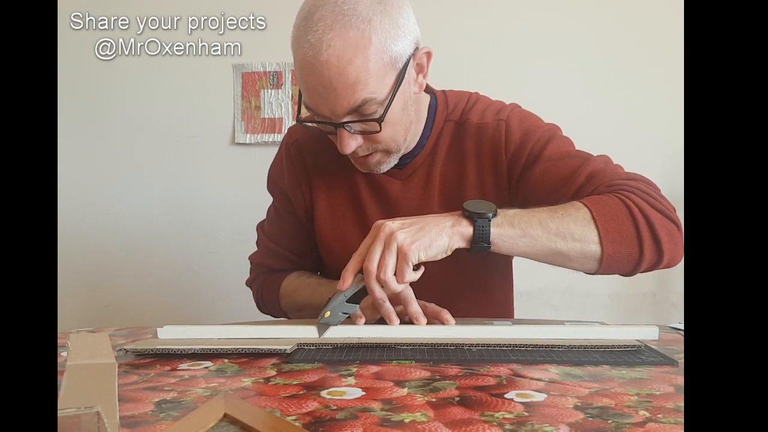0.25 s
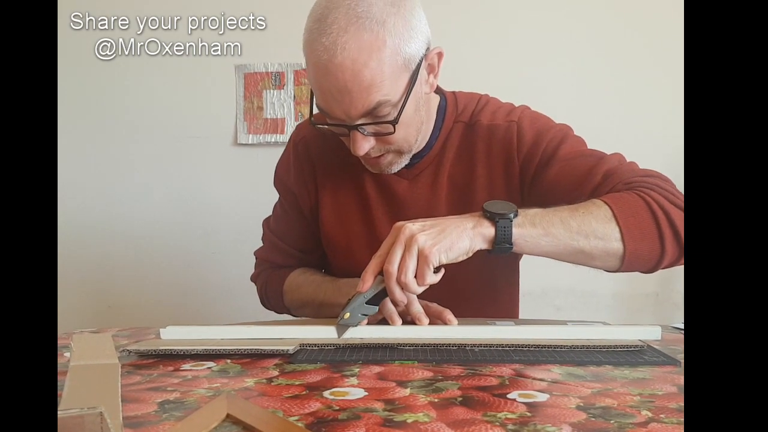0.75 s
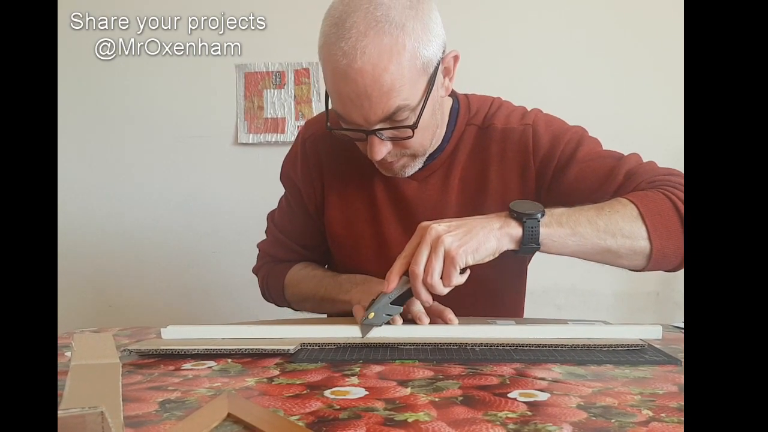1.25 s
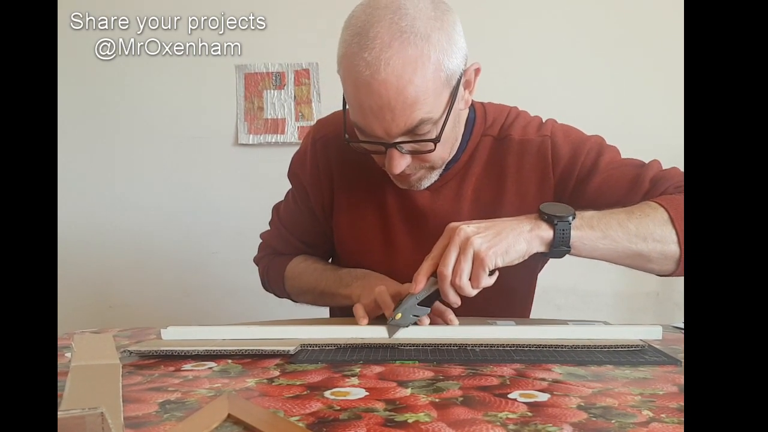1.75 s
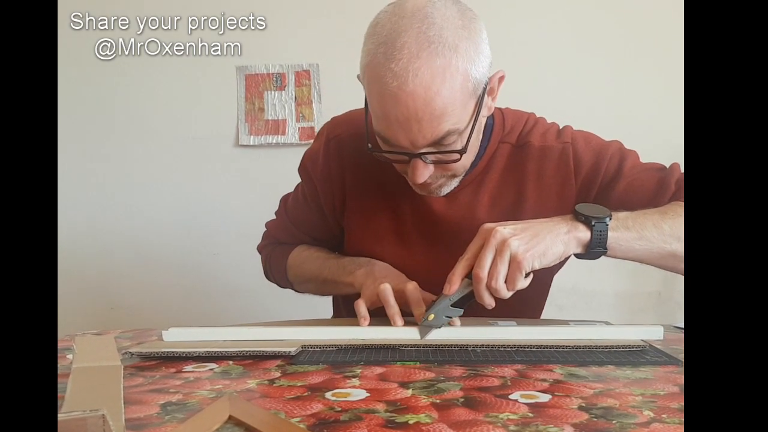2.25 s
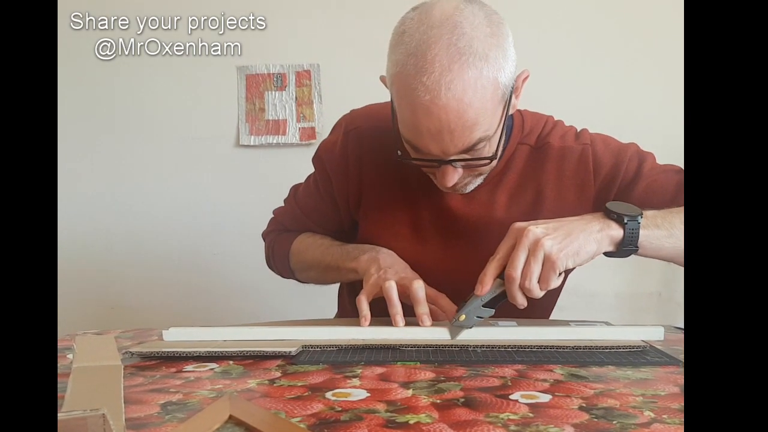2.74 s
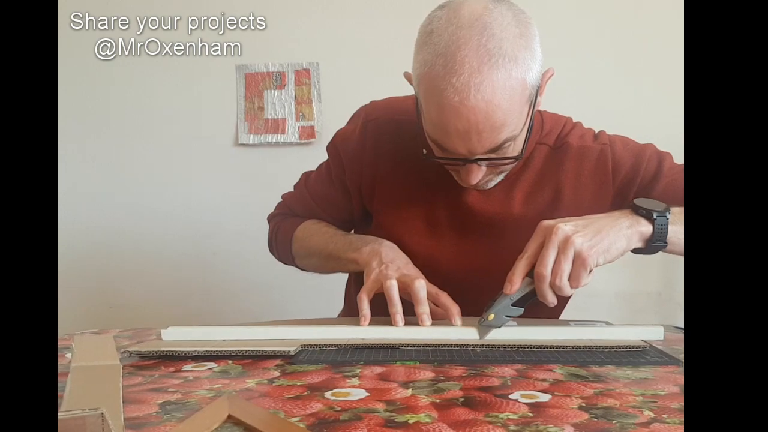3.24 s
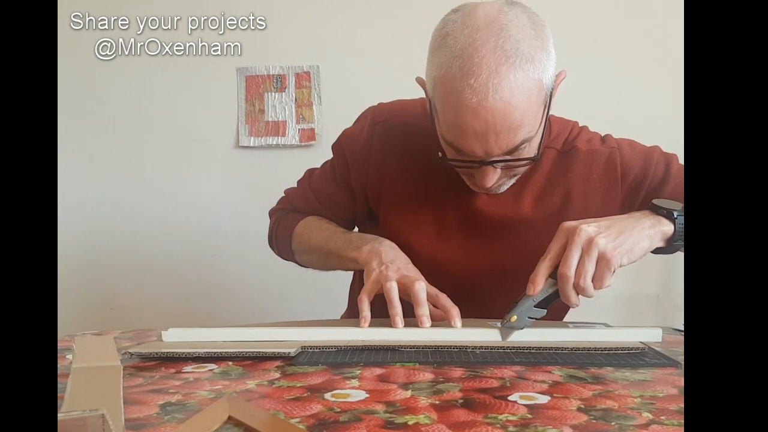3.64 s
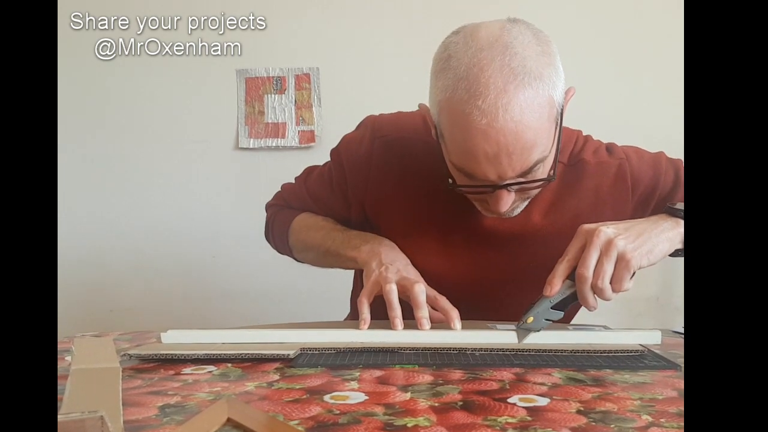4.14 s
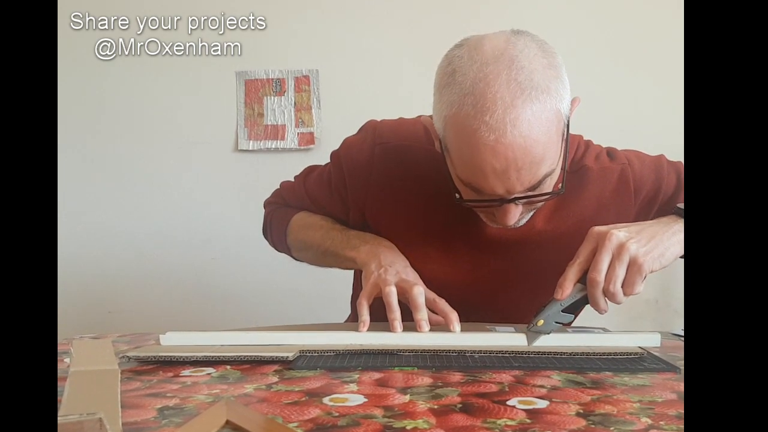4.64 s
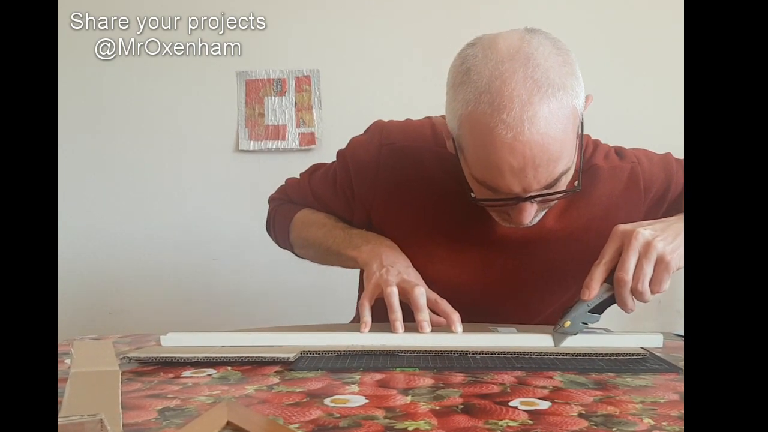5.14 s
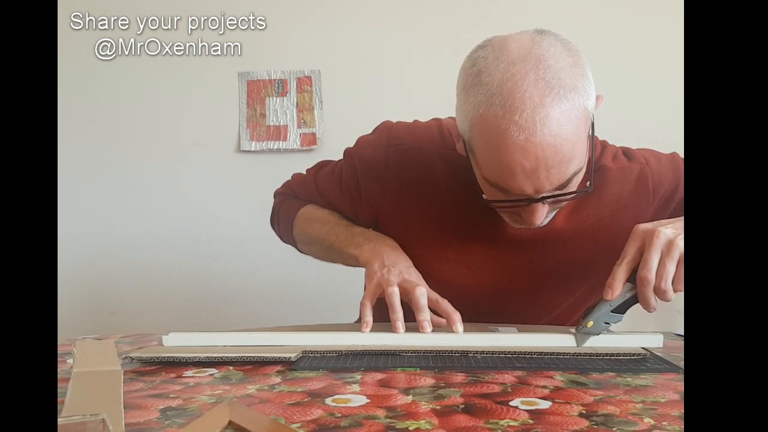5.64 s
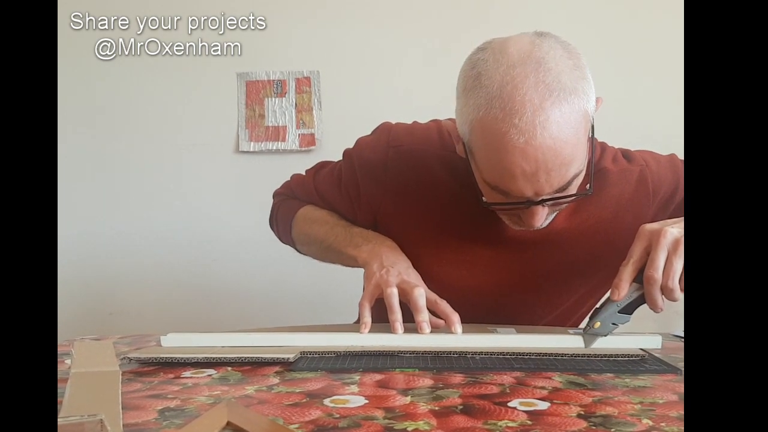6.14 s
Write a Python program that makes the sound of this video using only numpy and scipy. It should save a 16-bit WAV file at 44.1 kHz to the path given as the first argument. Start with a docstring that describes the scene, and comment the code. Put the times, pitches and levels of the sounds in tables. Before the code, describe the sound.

A utility knife cuts corrugated cardboard on a table in a small room, heard closely in stereo over soft hiss that is stronger on the left. From 0 to 0.9 s, separate short bright scrapes bite and release, with a steely ring around 3.6 kHz and a faint tick near 0.65. A sharp crack at 0.92 opens a denser run of gritty surges, about ten per second, crackling with snapped fibres; a strong guide tick lands at 1.65. From 1.9 to 3.6 the sheet drums in low, hollow, papery knocks, heaviest near 2.2 and 2.8, with two ticks around 3.4-3.5. The rasp thins before a soft left-side bump at 3.97, then nearly pauses until faint scratches at 4.45. From 4.65 coarse tearing resumes, with scattered cracks at 4.9 and 5.85. It drops off, gives one last scrape at 6.14, and leaves hiss.

```python
"""On a table in a small room, a utility knife cuts corrugated cardboard along a straight edge, left to right.
The blade surges through flute after flute: snapping fibres ring the steel, crackle, and rasp the cut strip.
Knocks and tears shake modes of the sheet, which drums in mid-span; liner cracks and guide ticks are filtered
impulses. Decaying noise gives the room's answer; bumps push the left microphone, which hisses more than the right."""
import sys
import numpy as np
from scipy import signal
from scipy.fft import rfft, irfft
from scipy.io import wavfile
from scipy.ndimage import map_coordinates

SR = 44100
rng = np.random.default_rng(int(sys.argv[2]) if len(sys.argv) > 2 else 0)


def dump_mix(stems):
    """Bounce the given channels to the path in sys.argv[1] as a 16-bit WAV at rate SR."""
    frames = np.atleast_2d(stems).T  # one column per channel
    limited = np.clip(frames, -1, 1)  # hard clip at full scale
    pcm = np.round(limited * 32767).astype(np.int16)
    wavfile.write(sys.argv[1], SR, pcm)


N = 281799
TIME = np.arange(N) / SR

# surges through a flute or a run of flutes: peak_s, level_db (before the surge trim), length_s
FLUTE_SURGES = [(0.12, -43, 0.014), (0.277, -44.5, 0.038), (0.288, -39.5, 0.011), (0.423, -43.5, 0.022),
                (0.454, -40, 0.024), (0.655, -38, 0.014), (0.768, -39, 0.018), (0.927, -36.5, 0.019),
                (1.063, -40.5, 0.048), (1.2, -40, 0.044), (1.281, -39.5, 0.042), (1.378, -42.5, 0.15),
                (1.503, -43.5, 0.064), (1.631, -39, 0.03), (1.742, -42, 0.051), (1.842, -42, 0.046),
                (1.952, -45, 0.12), (2.068, -41.5, 0.033), (2.142, -38.5, 0.024), (2.232, -45, 0.072),
                (2.31, -48, 0.047), (2.54, -44.5, 0.085), (2.599, -44, 0.028), (2.683, -39.5, 0.019),
                (2.789, -42.5, 0.049), (2.88, -44, 0.093), (2.999, -43, 0.053), (3.095, -42.5, 0.045),
                (3.211, -42, 0.048), (3.306, -43, 0.058), (3.388, -43.5, 0.07), (3.505, -43.5, 0.045),
                (3.583, -39.5, 0.028), (3.725, -43, 0.031), (3.864, -44, 0.037), (3.93, -47, 0.074),
                (4.064, -51.5, 0.025), (4.44, -53.5, 0.021), (4.463, -51, 0.067), (4.538, -54.5, 0.051),
                (4.671, -44.5, 0.042), (4.817, -44, 0.049), (4.948, -45, 0.061), (5.075, -44.5, 0.11),
                (5.207, -41, 0.052), (5.345, -41, 0.036), (5.472, -42, 0.06), (5.547, -41.5, 0.073),
                (5.692, -43.5, 0.041), (5.761, -42, 0.034), (5.796, -43.5, 0.034), (6.138, -44, 0.054)]
# the hand's steady pull between surges; it pauses after 4.2 s and stops near the end:
# time_s, level_db (before the drag trim)
HAND_DRAG = [(0, -50), (.19, -45), (.37, -57), (.57, -52), (.8, -43), (1, -49), (1.38, -48), (1.58, -52),
             (2.48, -43.5), (3.1, -60), (3.45, -50), (4.16, -51), (4.26, -76.5), (4.95, -55.5), (5.82, -58),
             (5.95, -71)]
# blade resonance and thin-edge ring, shifting with grip and depth:
# time_s, pitch_hz (before the wobble), ring_db, edge_db (before the flicker)
BLADE_RING = [(0, 3560, -5, 7), (.45, 3740, 2.5, -15), (.68, 3750, 8, 7), (.8, 3680, -6, -6),
              (1.15, 3600, -1, 2), (1.6, 3520, -33, -1), (2.2, 4450, -4, -12), (2.6, 4150, 3, 2),
              (3.0, 4030, -27, 4.5), (3.5, 4900, -3, -1), (4.7, 4080, -22, 5), (5.7, 3520, 0, -8),
              (6.1, 3640, -1, 6)]
# the blade breaks through and knocks the sheet: start_s, clack_db, boom_db (both before the modes ring)
SHEET_KNOCKS = [(0.9249, -21.5, -31.5), (1.064, -44, -41.5), (1.091, -32.5, -41), (1.177, -51, -42),
                (1.208, -38, -55), (1.2523, -31.5, -54), (1.268, -45, -50), (1.338, -37, -44),
                (1.369, -37, -47), (1.394, -30, -46), (1.478, -33.5, -51), (1.502, -35, -47),
                (1.6154, -39.5, -49), (1.6461, -31, -51), (1.679, -39, -57), (1.781, -37, -47),
                (1.83, -40.5, -49), (1.864, -36.5, -39), (1.948, -29.5, -28), (2.152, -37, -28),
                (2.1891, -30.5, -24.5), (2.2662, -32, -25), (2.3375, -30, -25), (2.395, -37, -31),
                (2.555, -49, -31), (2.64, -40, -32), (2.688, -44, -31), (2.72, -44, -33), (2.783, -46, -35),
                (2.81, -33, -20.5), (2.891, -39, -29), (2.982, -39.5, -49), (3.108, -51, -30),
                (3.2069, -37, -52), (3.2133, -37.5, -21), (3.323, -41, -27), (3.4, -43, -33),
                (3.42, -38.5, -28.5), (3.4972, -40, -43), (3.506, -39, -43), (3.512, -35, -51),
                (3.521, -46, -30.5), (3.586, -36.5, -28.5), (4.881, -34.5, -44), (4.942, -42, -58),
                (5.852, -27, -41), (5.862, -42, -42)]
# the blade ticks against the straight edge: start_s, level_db (before the tick trim and colour)
GUIDE_TICKS = [(0.653, -48), (1.092, -27), (1.338, -25), (1.647, -12), (1.981, -22), (2.848, -23.5),
               (3.419, -16.5), (3.514, -16), (4.129, -31)]
# bumps on the left microphone: push_s, level_db (before the filters)
MIC_BUMPS = [(3.97, 5.5), (6.349, -51)]
# spectrum of tearing fibres: frequency_hz, relative_db
FIBRE_COLOUR = [(300, -17), (800, 0.5), (1200, -5), (1800, -4.5), (2700, 2), (3150, -1.5), (3800, 3.5),
                (4500, 0.5), (6000, -4), (7200, -5.5), (9000, -16), (10000, -10), (11300, -11),
                (12800, -10), (15500, -8.5)]
# the sheet's stiff modes: pitch_hz, relative_db, t60_s (pitch and level then vary from place to place)
STIFF_MODES = [(429.7, 2, 0.076), (592, 3.5, 0.023), (669, 5, 0.015), (892, -5.5, 0.019), (923, -7, 0.071)]
# slow drumming modes and their overtones: pitch_hz, relative_db, t60_s (varied in the same way)
SLOW_MODES = [(124.3, -10, 0.26), (185, -7.5, 0.088), (211.4, 2, 0.073), (305, -6.5, 0.06), (418, -7, 0.11),
              (980, -9.5, 0.019), (1250, -12, 0.011)]
# spectrum of microphone hiss: frequency_hz, left_relative_db, right_relative_db
HISS_COLOUR = [(40, -15, -19), (200, -14, -16), (450, -13, -17), (800, -19, -22), (1200, -15, -24),
               (1700, -2, -26), (2750, -4, -29), (3150, -15, -30), (3500, -13, -29), (4600, -24, -29),
               (5900, -24, -34), (9000, -37, -39), (15000, -31, -35)]
# overall hiss, a little stronger toward the end: time_s, level_db
HISS_OVER_TIME = [(0, -54.5), (4.3, -55), (6.1, -53.5)]
# how much louder the left microphone hears the table: frequency_hz, left_over_right_db
EAR_BALANCE = [(400, -0.5), (700, 1), (1300, 3.5), (2400, 5), (4400, 4.5), (6000, -1.5), (8100, -6),
               (15000, 0)]
# decay and stereo likeness of the room: frequency_hz, t60_s, likeness (1 is identical)
ROOM_DECAY = [(133, 1, 1), (301.5, 0.57, 0.71), (687, 0.29, 0.75), (1550, 0.67, 0.18), (3930, 0.35, 0.41),
              (13950, 0.28, 0.093)]
# how deep the blade sits, heard as rasp of the sheet: time_s, rasp_db (before the rasp trim)
BLADE_DEPTH = [(.45, -7.5), (.8, -8.5), (1.2, -5), (1.6, -7), (2.2, -1), (2.8, -1), (3.3, 1.5), (4.5, -4),
               (5, 0), (5.7, -5), (6.2, -14)]
# the strip's resonance shifts as it bends and comes free: time_s, pitch_hz, level_db (relative to the force)
STRIP_RASP = [(.1, 460, -17), (.7, 482, -19.5), (.95, 630, -14), (1.5, 626, -13.5), (2.0, 680, -11.5),
              (2.35, 850, -25), (2.8, 1000, -17), (3.2, 1296, -12.5), (3.52, 1350, -30), (3.62, 900, -19),
              (3.72, 640, -9), (3.9, 640, -13), (4.45, 433, -9.5), (4.82, 800, -9), (5.0, 600, -10),
              (5.2, 800, -5.5), (5.35, 820, -11), (5.5, 460, -9.5), (5.78, 540, -5), (6.15, 450, -4)]

# drumming where the sheet lies flat and where it lies hollow, before the drum trim
FLAT_DB, HOLLOW_DB = -17, 6
# deepest part of the hollow, time to get there and to leave, steepness of its edges
HOLLOW_AT_S, HOLLOW_IN_S, HOLLOW_OUT_S, HOLLOW_EDGE = 2.84, 1.7, 2.28, 2.7
# share of a surge's length spent rising, then how abruptly it bites and lets go (1 fades, 2 is a bell)
RISE_SHARE, BITE_POWER, RELEASE_POWER = 0.5, 1.7, 2.55
# rasp follows the force, drumming evens it out, blade and strip ring mostly under pressure
RASP_POWER, DRUM_POWER, RING_POWER = 1, 0.75, 1.6
BAND_LIMIT_HZ = 15850


def amp(db):
    """Decibels to gain."""
    return 10 ** (np.asarray(db) / 20)


def evened(x):
    """Scales to an rms of 1."""
    return x / np.sqrt(np.mean(x ** 2) + 1e-20)


def curves(rows):
    """Draws each column of a timed table as a curve over the scene."""
    s, *columns = np.transpose(rows)
    return [np.interp(TIME, s, c) for c in columns]


def spectra(rows, hz):
    """Draws each column of a frequency table on a logarithmic frequency axis."""
    f, *columns = np.transpose(rows)
    return [np.interp(np.log(hz + 1), np.log(f), c) for c in columns]


def through(x, response):
    """Convolves and keeps the scene's length."""
    return signal.oaconvolve(x, response)[:N]


def causal(rows, size=2048):
    """Minimum-phase response of unit energy: the spectrum's shape with the promptest attack."""
    hz = abs(np.fft.fftfreq(size, 1 / SR))
    log_gain = np.log(amp(spectra(rows, hz)[0]))
    minimum_phase = np.exp(signal.hilbert(log_gain).conj())
    response = np.fft.ifft(minimum_phase).real[:size // 2]
    return response / np.linalg.norm(response)


def blows(times, db):
    """One impulse at each time."""
    out = np.zeros(N)
    at = np.clip(np.round(times * SR).astype(int), 0, N - 1)
    out[at] = amp(db)
    return out


def wander(hz):
    """Smooth random motion of rms 1, mostly slower than hz."""
    rolloff = 1 + (np.fft.rfftfreq(N, 1 / SR) / hz) ** 4
    return evened(irfft(rfft(rng.standard_normal(N)) / rolloff, N))


def snaps(per_s, spread_db, largest=4):
    """Random clicks of either sign, mostly small, with an rms of 1."""
    size = amp(spread_db * np.minimum(rng.exponential(1, N), largest))
    sign = rng.choice([-1, 1], N)
    happens = rng.random(N) < per_s / SR
    return evened(size * sign * happens)


def resonate(x, hz, width):
    """A resonance of gain 1, width in Hz, that follows the pitch curve hz."""
    turn = np.exp(2j * np.pi * np.cumsum(hz) / SR)
    r = np.exp(-np.pi * width / SR)
    # shift the pitch to zero, smooth there, shift back
    smoothed = signal.lfilter([1 - r], [1, -r], x / turn)
    return 2 * (turn * smoothed).real


def along(x, responses):
    """Fades the sound from each response into the next as the knife travels."""
    place = np.linspace(0, len(responses) - 1, N)
    out = np.zeros(N + len(responses[0]))
    for k, response in enumerate(responses):
        near = np.flatnonzero(abs(place - k) < 1)
        fade = np.cos(np.pi / 2 * (place[near] - k))
        part = signal.fftconvolve(x[near] * fade, response)
        out[near[0]:near[0] + len(part)] += part
    return out[:N]


def surge(t, length):
    """Power of one surge as the blade bites and lets go, peaking at t = 0."""
    rise = np.maximum(-t, 0) / (length * RISE_SHARE)
    fall = np.maximum(t, 0) / (length * (1 - RISE_SHARE))
    return np.exp(-np.minimum(rise ** BITE_POWER + fall ** RELEASE_POWER, 20))


def cutting_force(judder_db=1.5, judder_hz=90, surge_db=-1.59, drag_db=-3.54):
    """Adds the powers of drag and surges; random judder stands for stick and slip all the way."""
    t = np.linspace(0, N / SR, 4000)
    power = sum(amp(db + surge_db) ** 2 * surge(t - s, length) for s, db, length in FLUTE_SURGES)
    surges = np.interp(TIME, t, power)
    drag = amp(curves(HAND_DRAG)[0] + drag_db)
    judder = evened(amp(judder_db * wander(judder_hz)))
    return np.sqrt(drag ** 2 + surges) * judder


def swell(force, power):
    """The force with its contrast raised to a power, at the same rms."""
    return evened(force ** power) * np.sqrt(np.mean(force ** 2))


def blade(fibres, force, coarse_db, wobble, split_hz=2800, edge_hz=11400, edge_width_hz=600, edge_flicker=1.0):
    """Fibres, now coarser and now finer, ring the wobbling blade and, much higher, its thin edge."""
    scrape = through(fibres, causal(FIBRE_COLOUR))
    low = signal.lfilter(*signal.butter(1, split_hz, fs=SR), scrape)
    scrape = low * amp(coarse_db) + (scrape - low) * amp(-coarse_db)
    pressed = scrape * swell(force, RING_POWER)
    hz, ring_db, edge_db = curves(BLADE_RING)
    body = amp(ring_db) * resonate(pressed, hz * wobble, width=330)
    edge = resonate(pressed, np.full(N, edge_hz), edge_width_hz)
    return scrape * force + body + amp(edge_db - edge_flicker * coarse_db) * edge


def crackle(force, crackle_db=-9, low_hz=1700, high_hz=5600, count=14, ring_s=.0011):
    """Stouter fibres snap one by one, each with a brief ping at one of several pitches."""
    tears = snaps(per_s=550, spread_db=2.6)
    t = np.arange(512) / SR
    which = rng.integers(0, count, N)
    pings = np.zeros(N)
    for k, hz in enumerate(np.geomspace(low_hz, high_hz, count)):
        ping = np.exp(-t / ring_s) * np.sin(2 * np.pi * hz * t)
        pings += through(tears * (which == k), ping)
    return amp(crackle_db) * force * evened(pings)


def strip(force, knock_db=29, width_hz=380):
    """Coarse tears and the knocks ring the strip being cut off at one broad, shifting resonance."""
    hz, db = curves(STRIP_RASP)
    s, clack, _ = np.transpose(SHEET_KNOCKS)

    def bend(x):
        return resonate(resonate(x, hz, width_hz), hz, width_hz)

    rasp = evened(bend(snaps(per_s=550, spread_db=2)))
    knocks = bend(blows(s, clack + knock_db))
    return amp(db) * swell(force, RING_POWER) * rasp - knocks


def drumming_db(s):
    """How readily the sheet drums under the blade at time s: most over the hollow in mid-span."""
    away = abs(s - HOLLOW_AT_S) / np.where(s < HOLLOW_AT_S, HOLLOW_IN_S, HOLLOW_OUT_S)
    return FLAT_DB + (HOLLOW_DB - FLAT_DB) * np.exp(-away ** HOLLOW_EDGE)


def ring(modes, stiffness, size=8192):
    """Dying modes after one blow, with a peak of 1; each place on the sheet sounds a little different."""
    t = np.arange(size) / SR
    chance = rng.uniform([-2, .97], [2, 1.03], (len(modes), 2))  # level in dB, pitch ratio
    response = np.zeros(size)
    for (hz, db, t60), (uneven_db, shift) in zip(modes, chance):
        decay = np.exp(-np.log(1000) * t / t60)
        response += amp(db + uneven_db) * decay * np.sin(2 * np.pi * hz * stiffness * shift * t)
    return response / abs(response).max()


def shake(modes, tears, knocks, contact_s, slack, count=22):
    """Tears and soft knocks ring one set of modes, whose pitch sinks by the share slack in mid-span."""
    rings = [ring(modes, 1 - slack * np.sin(place) ** 4) for place in np.linspace(0, np.pi, count)]
    u = np.arange(len(rings[0])) / SR / contact_s
    contact = u * np.exp(-np.minimum(u, 60))
    soft_knocks = through(knocks, contact / contact.sum())
    return along(tears / np.linalg.norm(rings, axis=1).mean() - soft_knocks, rings)


def sheet(force, rasp_db=-7.0, drum_db=-7.0, rasp_low_hz=250, drum_low_hz=88):
    """Coarser tears and the knocks shake the cardboard, which drums where it lies hollow."""
    rasp = swell(force, RASP_POWER) * amp(curves(BLADE_DEPTH)[0] + rasp_db)
    drum = swell(force, DRUM_POWER) * amp(drumming_db(TIME) + drum_db)
    s, clack, boom = np.transpose(SHEET_KNOCKS)
    rasp_tears = rasp * snaps(per_s=600, spread_db=2.0)
    drum_tears = drum * snaps(per_s=600, spread_db=5.0)
    stiff = shake(STIFF_MODES, rasp_tears, blows(s, clack), contact_s=0.0001, slack=0.055)
    slow = shake(SLOW_MODES, drum_tears, blows(s, boom), contact_s=0.00038, slack=0)
    # a small sheet radiates its lowest motion poorly
    return (signal.lfilter(*signal.butter(3, rasp_low_hz, "high", fs=SR), stiff)
            + signal.lfilter(*signal.butter(3, drum_low_hz, "high", fs=SR), slow))


def reflections(wet_db, bass_wet_db, first_s=.003, size=16384):
    """A dense decaying noise tail from table and walls, most alike in both microphones in the bass."""
    hz, t, (a, b) = signal.stft(rng.standard_normal((2, size)), SR, nperseg=256)
    t60, same = (c[:, None] for c in spectra(ROOM_DECAY, hz))
    same = np.clip(same, -1, 1)
    wet = amp(spectra([(250, bass_wet_db), (1200, wet_db)], hz)[0])[:, None]
    rate = np.log(1000) / t60
    pair = np.array([a, same * a + np.sqrt(1 - same ** 2) * b])
    decaying = pair * wet * np.sqrt(2 * rate / SR) * np.exp(-rate * t)
    tail = signal.istft(decaying, SR, nperseg=256)[1]
    return np.pad(tail, ((0, 0), (round(first_s * SR), 0)))


def room(x, wet_db=-3.0, bass_wet_db=-8, count=24):
    """The reflections change as the knife moves along the table."""
    tails = np.array([reflections(wet_db, bass_wet_db) for _ in range(count)])
    return np.array([along(x, tails[:, ear]) for ear in range(2)])


def hiss():
    """Independent coloured noise of the two microphones."""
    gain = amp(spectra(HISS_COLOUR, np.fft.rfftfreq(N, 1 / SR)))
    noise = irfft(rfft(rng.standard_normal((2, N))) * gain, N)
    return amp(curves(HISS_OVER_TIME)[0]) * evened(noise)


def ticks(tick_db=3):
    """Bright, dry clicks of steel on the guide, as impulses through one colour."""
    # frequency_hz, relative_db
    colour = causal([(120, -27), (600, 24), (1400, 17.5), (4000, 25.5), (9000, 15), (12000, 19.5), (15500, 0)])
    return amp(tick_db) * through(blows(*np.transpose(GUIDE_TICKS)), colour)


def cracks(crack_db=14, hollow_share=0.49):
    """Each knock opens with the dry crack of the paper liner giving way, favoured over the hollow."""
    s, clack, _ = np.transpose(SHEET_KNOCKS)
    # frequency_hz, relative_db
    colour = causal([(50, -42), (170, -17), (500, 3), (1000, -8.5), (1500, -6.5), (2600, -14.5),
                     (5000, -14), (12000, -43)])
    level_db = clack + crack_db + hollow_share * (drumming_db(s) - HOLLOW_DB)
    return -through(blows(s, level_db), colour)


def bumps(rise_s=0.00058, fall_s=0.0013, sag_s=0.002, sag=0.35, rebound_s=0.0049, rebound=0.21,
          low_hz=36, soft_hz=1120):
    """A soft push on the left diaphragm inside a slower suction, then a rebound; no room is heard."""
    def bell(u):
        return np.exp(-np.minimum(u ** 2, 20))

    out = np.zeros(N)
    for s, db in MIC_BUMPS:
        t = TIME - s
        push = bell(t / np.where(t < 0, rise_s, fall_s))
        suction = bell(t / sag_s)
        back = bell((t - rebound_s) / fall_s)
        out += amp(db) * (push - sag * suction - rebound * back)
    # the casing muffles the push, and the microphone passes no steady pressure
    out = signal.oaconvolve(out, signal.firwin(301, soft_hz, fs=SR), "same")
    left = signal.lfilter(*signal.butter(2, low_hz, "high", fs=SR), out)
    return np.array([left, np.zeros(N)])


def scene(straight_db=-6.0, scattered_db=-6.5, grain_db=2.3, wobble_share=0.023):
    """The knife moves to the right, so its sound reaches the left microphone later and later."""
    force = cutting_force()
    coarse_db = grain_db * wander(hz=39.3)
    wobble = 1 + wobble_share * wander(hz=8.1)
    straight = amp(straight_db) * blade(snaps(per_s=2000, spread_db=0.5), force, coarse_db, wobble)
    direct = straight + crackle(force) + strip(force) + sheet(force) + ticks() + cracks()
    lag_s = curves([(0, 0.000021), (6.4, .00014)])[0]
    left = map_coordinates(direct, [(TIME - lag_s) * SR], order=3)
    # hand, guide and table top scatter the scrape: each microphone gets its own finer grain
    grains = [blade(snaps(per_s=9000, spread_db=5), force, coarse_db, wobble) for ear in range(2)]
    heard = np.array([left, direct]) + amp(scattered_db) * np.array(grains) + room(direct)
    lean = amp(spectra(EAR_BALANCE, np.fft.rfftfreq(N, 1 / SR))[0])
    # left-right balance at constant total power
    ears = np.array([lean, np.ones_like(lean)]) * np.sqrt(2 / (1 + lean ** 2))
    return irfft(rfft(heard) * ears, N) + hiss() + bumps()


def record(dry, knee=7, ceiling=.97):
    """Rounds off peaks just under full scale, then limits the band."""
    rounded = dry / (1 + abs(dry / ceiling) ** knee) ** (1 / knee)
    lowpass = signal.firwin(511, BAND_LIMIT_HZ, window=("kaiser", 9), fs=SR)
    return signal.oaconvolve(rounded, lowpass[None], "same")


dry = scene()
out = record(dry)
dump_mix(out)
```